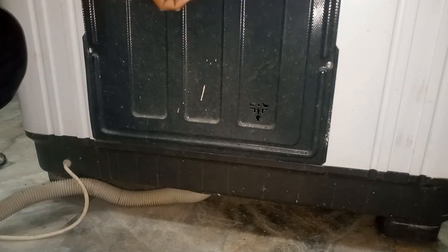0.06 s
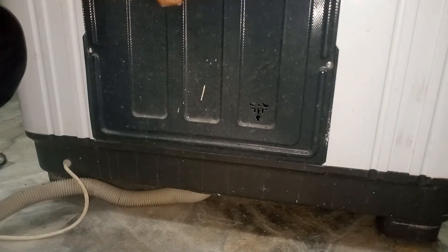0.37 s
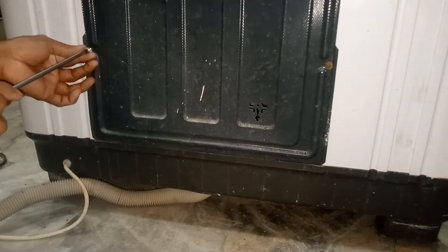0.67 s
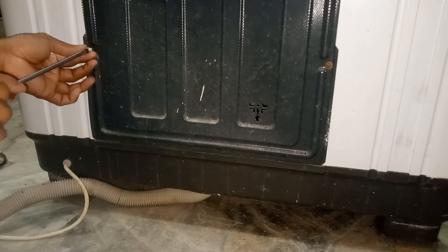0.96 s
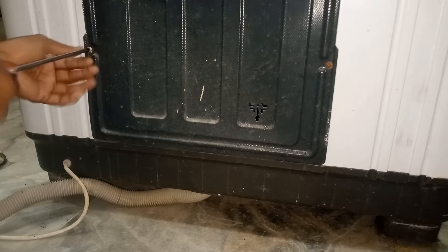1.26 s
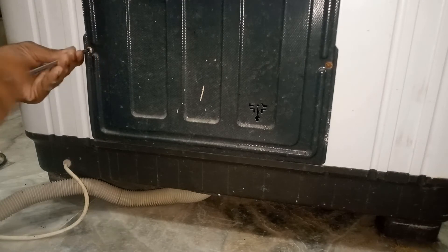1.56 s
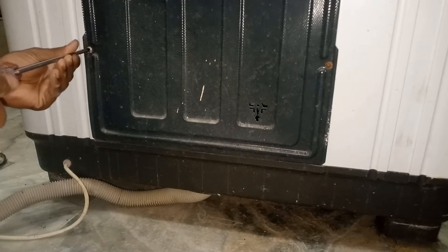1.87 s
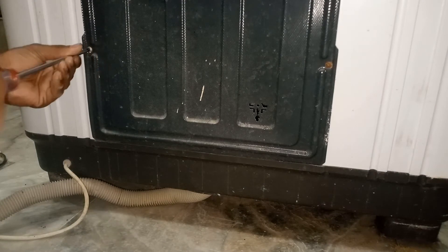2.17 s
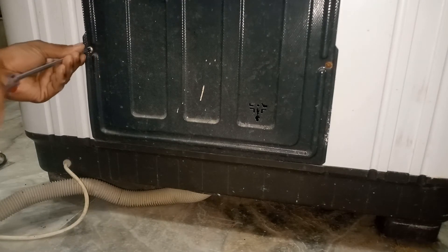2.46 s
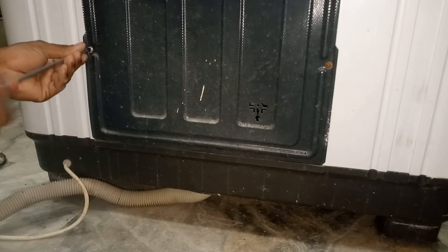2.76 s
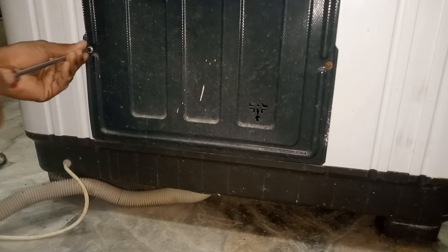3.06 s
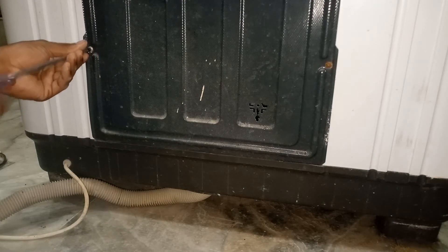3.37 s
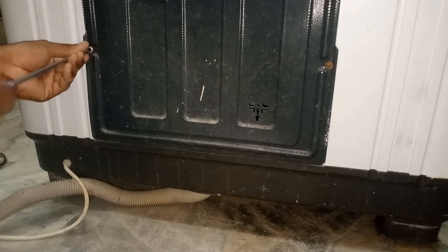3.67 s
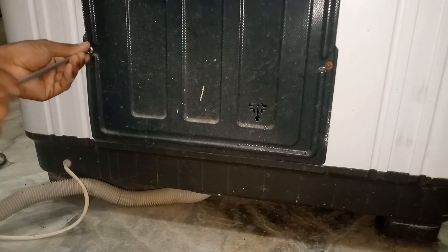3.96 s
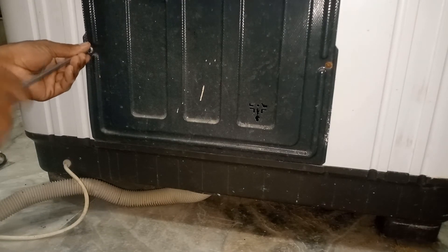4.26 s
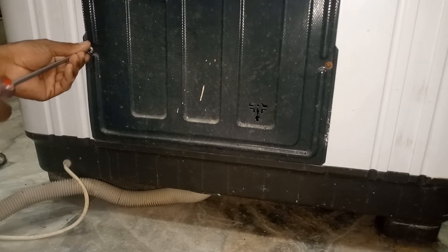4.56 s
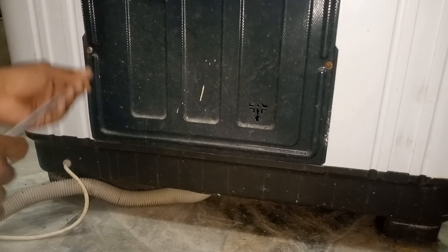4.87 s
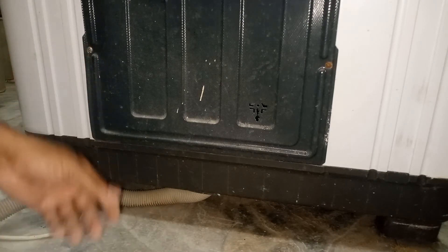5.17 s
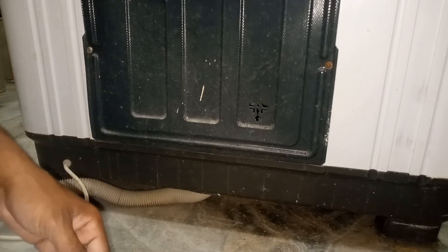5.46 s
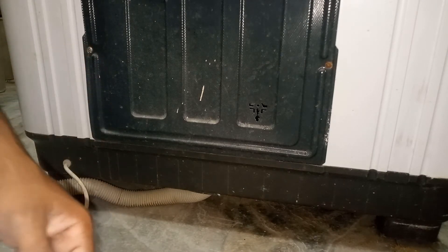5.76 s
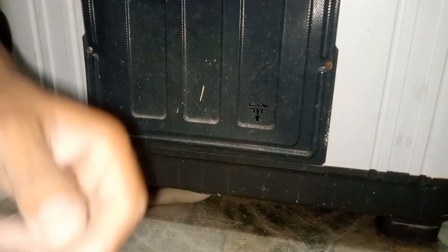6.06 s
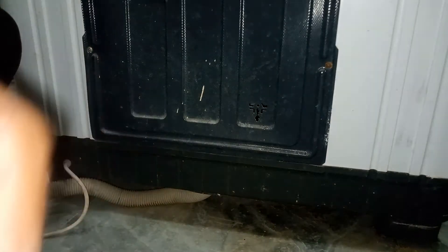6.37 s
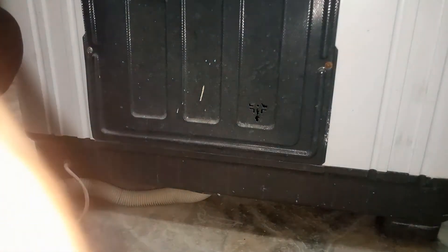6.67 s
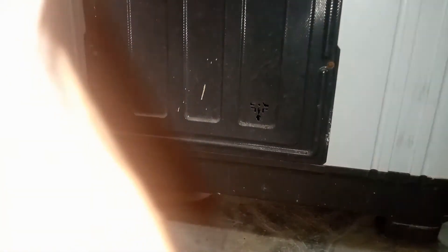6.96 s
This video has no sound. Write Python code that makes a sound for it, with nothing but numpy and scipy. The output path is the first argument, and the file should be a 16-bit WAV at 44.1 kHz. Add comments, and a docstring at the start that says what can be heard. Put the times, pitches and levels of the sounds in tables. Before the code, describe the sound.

A faint low rumble fills a small, hard-walled room throughout. In the first half second, clothes rustle while a hand and screwdriver knock on an appliance's hollow plastic cover, close by, with a sharp steel tick. Another knock comes at about 1.2 seconds, and a cluster of clicks and knocks around 2 seconds as the tip seats. From 2.3 to 4.5 seconds the screw turns in about seven short twists, its quiet grinding fading, mixed with soft panel bumps and tiny ticks. A firmer double knock follows at 4.8 seconds. At about 5.6 seconds the tool's handle taps the stone floor, slightly farther away. At 5.8 seconds the steel hits with a bright clash, the loudest sound, chattering and ringing for about half a second. Soft clothing rustle, scuffs and a few light ticks continue until just after 7 seconds.

```python
"""A screwdriver seats and turns a screw in the plastic cover of an appliance, close up in a small hard room.
Hand and tool knock the hollow panel, the thread grinds at each twist, the steel tip ticks, clothes rustle.
Then a steel tool lands on the stone floor, handle first, chatters and rings.
A low room rumble lies under it all."""
import sys
import numpy as np
from scipy import signal
from scipy.fft import rfft, irfft
from scipy.io import wavfile

SR = 44100
rng = np.random.default_rng(int(sys.argv[2]) if len(sys.argv) > 2 else 0)


def inscribe(sig):
    """Save sig as 16-bit PCM at rate SR to the path in sys.argv[1].

    A 1-D sig is mono; a 2-D sig holds one channel per row.
    Samples are clipped to [-1, 1] before scaling.
    """
    pcm = np.round(np.clip(np.atleast_2d(sig).T, -1, 1) * 32767)
    wavfile.write(sys.argv[1], SR, pcm.astype(np.int16))


N = 318402
T = np.arange(N) / SR

# Tone colours. Each row: frequency in Hz, relative level in dB.
ROOM_TONE_EQ = [(25, -24), (40, -18), (60, -7), (135, 0), (200, -15), (270, -27), (700, -30.5), (1300, -32),
                (2800, -36.5), (4500, -36), (6300, -31.5), (7300, -35), (8200, -49), (10300, -59)]
RUB_EQ = [(300, -15), (1000, -23.5), (1900, -14), (3000, -12), (4500, -8), (5800, -4), (6700, 1),
          (7400, -7), (8200, -19), (10400, -27.5)]
CLASH_EQ = [(300, -24.5), (1000, -30), (2000, -21.5), (2400, -20), (2750, -20), (3150, -28), (3700, -7.5),
            (4050, -15), (4400, -14.5), (5050, -12), (5380, 6), (5560, -5), (5850, 2.5), (6200, -4),
            (6750, 5.5), (7450, 1), (7850, -14.5), (8500, -13.5), (10400, -29)]
PLASTIC_EQ = [(50, -26), (130, 8), (300, -9.5), (550, 2), (900, -2.5), (1400, -4), (2000, -12.5),
              (2600, -8), (3300, -1.5), (4600, -22), (6500, -26), (8000, -34.5), (10500, -67.5)]
GRIT_EQ = [(1000, -27), (4000, -16.5), (5600, -1.5), (6600, 4), (7500, -1.5), (8400, -19.5), (10400, -25)]
THREAD_EQ = [(100, -0.5), (280, 12), (350, -1), (450, 6.5), (600, 11.5), (800, -11), (1000, -3), (1350, -5),
             (1800, -17.5), (2500, -8.5), (4000, -38.5), (8000, -40)]
# Ringing bodies. Each row: pitch in Hz, relative level in dB, 60 dB decay time (t60) in seconds.
HANDLE_MODES = [(563, -3.5, 0.12), (1100, -2.5, 0.049), (1160, -0.5, .05), (1614, -1, 0.095),
                (2230, -9.5, 0.064), (2800, -5, 0.13), (3840, -9.5, 0.13), (4750, -7, .06)]
STEEL_MODES = [(2745, -27, .45), (3628, -14, .5), (3700, -15, .4), (3806, -14, .8), (4366, -17, .45),
               (4560, -17, .35), (4877, -14, .45), (5012, -12, .3), (5265, -7, .45), (5399, 0, .66),
               (5577, -12, .45), (5722, -10, .6), (5782, -4, .5), (5992, -5, .3), (6132, -13, .5),
               (6169, -12, .5), (6274, -6, .5), (6444, -12, .5), (6616, -2, .5), (6702, -1, .42),
               (6771, 0, .48), (6868, 0, .48), (6958, -3, .56), (7093, -7, .45), (7227, -5, .55),
               (7300, -4, .5), (7372, -2, .42), (7417, -5, .4), (7462, -2, .35), (8220, -15, .42),
               (8360, -14, .45), (8958, -19, .38)]
PANEL_MODES = [(66.2, -8, 0.52), (100.3, -7, 0.38), (129.5, 2, 0.2), (167, 5.5, 0.051), (236.5, -3, 0.17),
               (261.4, 0.5, 0.085), (294.2, 1.5, 0.11), (403.5, -20.5, 0.15), (434.2, -1.5, 0.1),
               (482.4, 0.5, 0.12), (514.3, 3, 0.1), (588, 11, 0.062), (663, -10, 0.021), (697, -1.5, 0.034),
               (768, -2.5, 0.13), (795, -10, 0.24), (963, -0.5, 0.054), (1030, -25, 0.052),
               (1084, -2.5, 0.0045), (1370, 0.5, 0.0087), (1760, -28, 0.058), (2200, -28.5, 0.086)]
# The room's tail. Each row: frequency in Hz, t60 in seconds.
ROOM_DECAY = [(70, 1), (150, 0.43), (420, 0.47), (1100, 0.53), (3000, 0.58), (7500, 0.5)]
# Bounces off the cabinet front and the floor. Each row: delay in milliseconds, gain in dB.
REFLECTIONS = [(1.35, -23), (2.902, -19), (4.596, -8)]
# Cloth strokes and hand pressure. Each row: start of the hold and its length in seconds, relative dB.
CLOTH_STROKES = [(0, 0.26, -68), (0.324, 0.29, -72.5), (1.852, 0.057, -73), (2.058, 0.0082, -70),
                 (5.041, 0.13, -84.5), (5.363, 0.2, -88.5), (5.567, 0.052, -79), (5.8, 0.032, -64),
                 (6.325, 0.13, -71.5), (6.517, 0.077, -90), (7.174, .01, -82.5)]
HAND_PRESSES = [(0.133, 0.33, -45), (0.699, 0.19, -52), (1.247, 0.12, -41), (1.638, 0.94, -47.5),
                (1.943, 0.37, -48.5), (2.496, 2, -50), (4.04, 0.073, -55.5)]
# Steel hitting stone. Each row: start in seconds, relative level in dB.
FLOOR_HITS = [(5.7975, -17.5), (5.8, -14), (5.807, -28.5), (5.828, -32), (5.837, -27), (5.843, -27),
              (5.849, -23), (5.854, -30), (5.862, -33), (5.881, -29), (5.893, -27), (5.905, -31),
              (5.935, -27), (5.951, -32), (5.97, -38), (5.992, -37)]
# Light taps of the tool on the floor, and of tool and fingers close by.
# Each row: start in seconds, relative level in dB, centre in Hz, width in octaves, t60 in seconds.
FLOOR_TAPS = [(5.555, -36, 2150, 2, 0.024), (5.784, -40.5, 1510, 1.9, 0.022),
              (5.837, -46, 3740, 0.11, 0.03), (5.911, -34, 2780, 0.077, 0.03),
              (5.930, -40, 2734, 0.086, 0.024), (5.951, -45, 3400, 0.5, 0.02)]
CLOSE_TAPS = [(.730, -69, 2200, 4.4, 0.0034), (.767, -63, 3920, 2.4, .058), (3.769, -68, 2000, 6.7, 0.0044),
              (3.952, -64, 2210, 0.37, 0.067), (6.570, -56, 2170, 1.6, 0.11),
              (7.172, -52.5, 3820, 1.5, 0.016)]
# Dry squeaks and scuffs of hand and tool.
# Each row: middle and half-length in seconds, relative level in dB, centre in Hz, width in octaves.
SCUFFS = [(0.093, 0.99, -70, 1790, 0.14), (2.329, 0.074, -60.5, 656, 0.92), (2.46, 0.078, -76, 2285, 0.13),
          (2.787, 0.017, -66, 2430, 0.28), (2.946, 0.094, -75.5, 2720, 0.12),
          (4.346, 0.031, -76, 6500, 0.4), (6.365, 0.056, -64.5, 4080, 0.78),
          (6.434, 0.035, -67, 1330, 0.24), (6.467, 0.065, -65.5, 2510, 1.7),
          (6.611, 0.036, -64.5, 1920, 3.1), (6.73, 0.067, -73, 2150, 0.95), (6.959, 0.035, -63, 6010, 0.51)]
# The steel tip on metal. Each row: start in seconds, level in dB, t60 in seconds.
TIP_TICKS = [(0.2376, -37.5, 0.02), (1.255, -61, 0.15), (2.011, -44, 0.021), (2.019, -34, 0.0098),
             (2.026, -49, 0.011), (2.2575, -50, .012), (2.587, -59, .015), (2.661, -55, .012),
             (2.704, -47.5, 0.014), (3.212, -56.5, 0.013), (3.391, -57, 0.011), (3.604, -53, 0.013),
             (4.2918, -38.5, 0.009), (4.459, -44.5, 0.015), (5.722, -33.5, 0.036), (6.422, -47, 0.022),
             (7.147, -46.5, 0.11)]
# Blows on the panel. Each row: start in seconds, strength in dB, softness in dB, extra thump in dB,
# pitch of the struck spot in Hz, pitch of the thump in Hz.
KNOCKS = [(0.152, -36, 17, 0, 300, 137.4), (0.175, -39, 20, -28, 285, 160), (0.207, -43, 17.5, 9, 240, 162),
          (0.290, -26.5, 11.5, -8.5, 262, 160), (0.778, -50.5, 14, 6, 249, 142.5),
          (0.917, -53.5, 18, 9.5, 237, 141.4), (1.109, -46, 20, 4.5, 241, 134.7),
          (1.143, -49.5, 22, 8.5, 257, 138), (1.249, -31.5, 14.5, -6.5, 212, 146),
          (1.873, -38, 20, -19, 486, 134), (1.927, -30.5, 9, -6.5, 600, 130),
          (2.011, -32.5, 5.5, -5.5, 432, 131.7), (2.018, -31.5, 12, -3.5, 453, 133.4),
          (2.233, -49, 10.5, -12, 597, 118), (2.262, -42.5, 9.5, -11, 584, 116),
          (2.508, -53, 25, 2, 231, 125), (2.596, -59, 29, 2, 283, 132), (2.737, -49.5, 9.5, 18, 221, 132),
          (2.782, -67, 21, 13, 282, 112), (2.968, -61.5, 24, 16.5, 282, 134),
          (3.027, -50.5, 19, -9, 480, 135), (3.115, -34.5, 14.5, 2, 286, 131.3),
          (3.339, -38.5, 27.5, 4, 279, 126.6), (3.412, -51, 21, 11.5, 450, 130),
          (3.541, -48.5, 24.5, 0, 291, 140), (3.619, -57.5, 30, 7, 289, 137),
          (3.701, -36.5, 28.5, -4.5, 292, 116), (3.777, -47, 17.5, 0, 292, 133.6),
          (3.889, -42.5, 23, -17, 290, 131), (3.961, -57, 21, 13, 281, 127),
          (4.047, -35, 28.5, 0, 292.4, 127), (4.189, -54.5, 29, 16.5, 220, 129.8),
          (4.238, -42.5, 27.5, -6.5, 276, 131.3), (4.385, -36.5, 14, 7.5, 483, 132),
          (4.402, -33, 27, -34.5, 258, 128), (4.652, -50.5, 28, 6.5, 280, 120),
          (4.782, -27, 14, 0, 278, 129.3), (4.793, -25, 13.5, 7, 281.7, 125.2)]
# A knock's thump, body, clack and crack registers. Each row: low edge in Hz, high edge in Hz.
KNOCK_BANDS = [(74, 200), (200, 400), (400, 900), (900, 2300)]
# Twists of the wrist. Each row: middle in seconds, relative level of the finger hiss in dB.
TWISTS = [(2.295, -59.5), (2.691, -62), (3.064, -63), (3.438, -63.5), (3.779, -70), (4.137, -65.5),
          (4.471, -60.5)]

# One value per register: a hard contact's level, and the dB it loses per dB of softness.
HARD_DB, SOFT_LOSS = np.array([0.47, 0.78, 12.2, 3]), np.array([0.17, 0.12, 1.344, 1.38])
HARD_PUSH_S = 0.0015  # rise time of a hard contact; softer ones take longer
TIP_HZ, TIP_OCTAVES = 6300, 0.43
TWIST_S, REGRIP_S, REGRIP_SHARE = 0.081, 0.2, 0.59  # a regrip peaks this share of the way to the next twist
GRIND_DB, EASE_DB_PER_S = -49.5, 9.5  # the thread grinds less with every turn
CEILING, TOP_HZ = 0.7, 10450


def undb(db):
    """Decibels to gain."""
    return 10 ** (np.asarray(db) / 20)


def unit(x):
    """Scale to rms 1."""
    return x / np.sqrt(np.mean(x ** 2) + 1e-20)


def add(track, s, sound):
    """Mix a sound into a track at s seconds."""
    i = int(s * SR)
    sound, i = sound[max(-i, 0):], max(i, 0)
    track[i:i + len(sound)] += sound[:max(N - i, 0)]


def along(points, hz):
    """Read (Hz, value) points on a log-frequency axis."""
    f, value = np.transpose(points)
    return np.interp(np.log(hz + 1e-3), np.log(f), value)


def colour(x, points, size=4096):
    """Minimum-phase EQ through the given (Hz, dB) points."""
    cepstrum = irfft(along(points, np.fft.rfftfreq(size, 1 / SR)) * np.log(10) / 20)
    cepstrum[1:size // 2] *= 2
    cepstrum[size // 2 + 1:] = 0
    return signal.fftconvolve(x, irfft(np.exp(rfft(cepstrum))))[:len(x)]


def band(x, lo, hi, order=2):
    """Band-pass between two edges in Hz."""
    return signal.sosfilt(signal.butter(order, [lo, hi], "band", fs=SR, output="sos"), x)


def resonance(x, hz, octaves):
    """One resonance of the given width, with the lows and the very top trimmed."""
    edge = 2 ** (octaves / 2)
    return band(band(x, hz / edge, hz * edge), 520, 6900, order=4)


def fade(t, t60):
    """Exponential decay, 60 dB down after t60 seconds."""
    return np.exp(-np.log(1000) * t / t60)


def burst(t, t60):
    """A decaying puff of noise."""
    return rng.standard_normal(len(t)) * fade(t, t60)


def ping(t, hz, t60):
    """A decaying sine."""
    return fade(t, t60) * np.sin(2 * np.pi * hz * t)


def ring(modes, t, scatter_db=0, detune=0):
    """Struck modes; scatter and detune vary their balance and pitch from hit to hit."""
    hz, db, t60 = np.transpose(modes)[:, :, None]
    weight, shift, side = rng.standard_normal((3, len(modes), 1))
    # a mode starts up or down, depending on which side of its nodal lines is hit
    gain = np.sign(side) * undb(db + scatter_db * weight)
    return np.sum(gain * ping(t, hz * (1 + detune * shift), t60), axis=0)


def walk(rate):
    """Random drift with `rate` turning points a second, spread near 1."""
    return np.interp(T * rate, np.arange(4096), rng.standard_normal(4096))


def stroke(start, length, attack_s, release_s):
    """Envelope of a hand movement: it swells up to `start`, holds and dies away."""
    rise = (np.maximum(start - T, 0) / attack_s) ** 2
    fall = np.maximum(T - start - length, 0) / release_s
    return np.exp(-rise - fall)


def swing(middle, length):
    """Bell-shaped effort of one movement of the wrist."""
    return np.exp(-4.4 * ((T - middle) / length) ** 2)


def friction(eq, grain_db):
    """Dense tiny slips of uneven size, coloured by the surface."""
    slips = rng.standard_normal(N) * undb(grain_db * walk(400))
    return unit(colour(slips, eq))


def room_tone():
    """The bed: a wavering low rumble with a faint hiss and a droning room resonance."""
    rumble = unit(colour(rng.standard_normal(N), ROOM_TONE_EQ)) * undb(-56.5 + 1.1 * walk(6))
    drone_gain = undb(-61 + 2.5 * walk(10))
    return rumble + drone_gain * unit(band(rng.standard_normal(N), 109, 161))


def room_tail():
    """Diffuse echo of bare walls: octave bands of noise, each with its own decay; energy 1."""
    t, tail = T[:SR], 0
    f = np.fft.rfftfreq(SR, 1 / SR)
    for hz in 40 * 2. ** np.arange(10):
        octave = irfft(rfft(rng.standard_normal(SR)) * ((f >= hz) & (f < 2 * hz)))
        tail = tail + octave * fade(t, along(ROOM_DECAY, hz * np.sqrt(2)))
    tail = tail * np.clip((t - .005) / 0.0097, 0, 1)  # pre-delay, then a quick fade-in
    return tail / np.sqrt(np.sum(tail ** 2))


def with_reflections(x):
    """Hard surfaces next to the hand send back close copies that comb the tone."""
    return x + sum(undb(db) * np.interp(T - ms / 1000, T, x, left=0) for ms, db in REFLECTIONS)


def rustle():
    """Cloth and skin slide with a soft uneven hiss."""
    movement = sum(undb(db) * stroke(s, length, attack_s=0.079, release_s=0.056)
                   for s, length, db in CLOTH_STROKES)
    flutter = undb(2.2 * walk(34))
    return friction(RUB_EQ, grain_db=1.5) * movement * flutter


def leaning_hand():
    """The pressing hand keeps the cabinet's low modes stirring in fits."""
    push = rng.standard_normal(N) * undb(4 * walk(15))
    cabinet = ring(PANEL_MODES, T[:SR // 8], scatter_db=1, detune=0.005)
    body = signal.fftconvolve(push, cabinet)[:N]
    pressure = sum(undb(db) * stroke(s, length, attack_s=.04, release_s=.09)
                   for s, length, db in HAND_PRESSES)
    return unit(band(body, 34, 223)) * pressure


def scuffs():
    """Skin and steel slide briefly, each slide exciting one resonance."""
    out, t = np.zeros(N), T[:SR // 2] - .25
    for s, half_length, db, hz, octaves in SCUFFS:
        slips = resonance(rng.standard_normal(len(t)), hz, octaves)
        add(out, s + t[0], undb(db) * unit(slips) * np.exp(-(t / half_length) ** 2))
    return out


def taps(contacts):
    """Light contacts, each a burst in one short resonance."""
    out, t = np.zeros(N), T[:SR // 5]
    for s, db, hz, octaves, t60 in contacts:
        tap = resonance(burst(t, t60), hz, octaves)
        add(out, s, tap * undb(db) / np.std(tap[:SR // 150]))
    return out


def handle_ring(start_s=5.555):
    """The tool's hollow handle touches the floor first and rings."""
    out = np.zeros(N)
    tone = ring(HANDLE_MODES, T[:SR // 2])
    add(out, start_s, undb(-44.5) * tone / np.std(tone[:SR // 50]))
    return out


def floor_clashes():
    """The steel tool hits stone and chatters; every contact is a sharp clash."""
    out, t = np.zeros(N), T[:SR // 10]
    for s, db in FLOOR_HITS:
        clash = colour(burst(t, t60=0.02), CLASH_EQ)
        add(out, s, undb(db) * clash / np.std(clash[:SR // 250]))
    return out


def steel_ring():
    """The first clash sets the steel ringing in close, beating modes."""
    out = np.zeros(N)
    tone = ring(STEEL_MODES, T[:SR])
    add(out, FLOOR_HITS[0][0], undb(-27.5) * tone / np.std(tone[:SR // 20]))
    return out


def panel_knocks():
    """Each blow rings the hollow panel with a crack and a buzz; softer contacts come out duller."""
    out, t = np.zeros(N), T[:SR // 2]
    attack = SR // 40  # each register's level is set on its first 25 ms
    for s, strength_db, soft_db, thump_db, spot_hz, thump_hz in KNOCKS:
        levels = strength_db + HARD_DB - soft_db * SOFT_LOSS
        levels[0] += thump_db
        crack = undb(-0.5) * unit(colour(burst(t, t60=0.027), PLASTIC_EQ))
        buzz = undb(-10) * unit(colour(burst(t, t60=0.24), PLASTIC_EQ))  # the loose cover
        modes = ring(PANEL_MODES, t, scatter_db=2.5, detune=0.014)
        spot = undb(8.5) * ping(t, spot_hz, t60=0.078)  # the plastic right under the contact
        thump = undb(7.5) * ping(t, thump_hz, t60=0.24)  # the cabinet wall booms behind it
        push_s = HARD_PUSH_S * undb(0.47 * soft_db)
        give = 1 - np.exp(-t / push_s)  # the plastic yields before it pushes back
        blow = give * (unit(modes + spot + thump) + crack + buzz)
        for (lo, hi), db in zip(KNOCK_BANDS, levels):
            part = band(blow, lo, hi, order=4)
            add(out, s, part * undb(db) / np.std(part[:attack]))
        # the treble snap follows the crack register, so it speaks on hard contacts
        snap = band(give * (crack + buzz), 5300, 7300, order=4)
        add(out, s, snap * undb(levels[-1] - 11) / np.std(snap[:attack]))
    return out


def tip_ticks():
    """The steel tip snaps home with a tick, always at one pitch, and the shaft rings on faintly."""
    out, t = np.zeros(N), T[:SR // 5]
    edge = 2 ** (TIP_OCTAVES / 2)
    lo, hi = TIP_HZ / edge, TIP_HZ * edge
    shaft = undb(-7.5) * band(ping(t, TIP_HZ, t60=0.16), lo, hi)
    for s, db, t60 in TIP_TICKS:
        tick = band(burst(t, t60), lo, hi, order=3)
        add(out, s, undb(db) * (tick / np.std(tick[:SR // 500]) + shaft))
    return out


def grit(grains_per_s=320):
    """Sparse grains under the tip catch and let go, each a tiny bright click."""
    catches = (rng.random(N) < grains_per_s / SR) * rng.choice([-1, 1], N)
    sizes = undb(-5 * rng.standard_normal(N))
    return unit(colour(catches * sizes, GRIT_EQ))


def screw_turns():
    """Each twist: fingers hiss on the shaft, grit rubs, the thread grinds in the plastic."""
    times = np.transpose(TWISTS)[0]
    regrip_times = times[:-1] + REGRIP_SHARE * np.diff(times)  # the fingers slide back between twists
    twisting = sum(undb(db) * swing(s, TWIST_S) for s, db in TWISTS)
    regripping = undb(-71.5) * sum(swing(s, REGRIP_S) for s in regrip_times)
    grinding = sum(undb(GRIND_DB - EASE_DB_PER_S * (s - times[0])) * swing(s, 1.19 * TWIST_S)
                   for s in times)
    skin = undb(-2.5) * friction(RUB_EQ, grain_db=4) * undb(2.5 * walk(70))
    hiss = skin + undb(-4) * grit()
    return (twisting + regripping) * hiss + grinding * friction(THREAD_EQ, grain_db=-2)


def scene():
    """The panel work is close and centred; the floor hit is further off, wetter and a touch right."""
    knocks, clashes = panel_knocks(), floor_clashes()
    floor_taps, handle = taps(FLOOR_TAPS), handle_ring()
    handwork = undb(8) * with_reflections(taps(CLOSE_TAPS) + screw_turns() + scuffs()) + tip_ticks()
    cloth = undb(17) * with_reflections(rustle())
    walls = room_tail()
    # the panel radiates little of its deepest bass and top treble into the room
    radiated = band(knocks, 140, 13000, order=1)
    near_send = undb(-2) * radiated + undb(-8.5) * handwork + undb(-13.5) * cloth
    near = knocks + handwork + leaning_hand() + cloth + room_tone()
    near += signal.fftconvolve(near_send, walls)[:N]
    floor_send = undb(-1.5) * clashes + undb(-5) * (floor_taps + handle)
    floor = clashes + floor_taps + handle + steel_ring()
    floor += signal.fftconvolve(floor_send, walls)[:N]
    return near + floor * undb([[-.3], [.3]])


def record(dry):
    """Soft clipping rounds the loudest peak; a steep low-pass cuts the top."""
    rounded = CEILING * np.tanh(dry / CEILING)
    return signal.sosfilt(signal.ellip(10, .2, 70, TOP_HZ, fs=SR, output="sos"), rounded)


dry = scene()
out = record(dry)
inscribe(out)
```